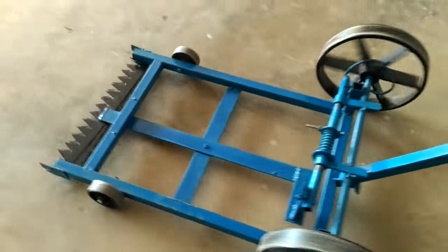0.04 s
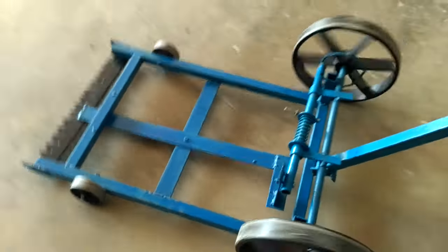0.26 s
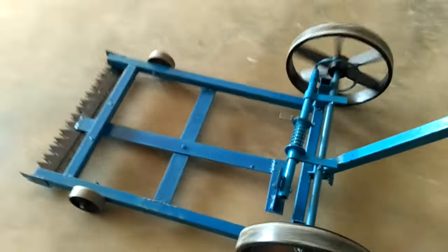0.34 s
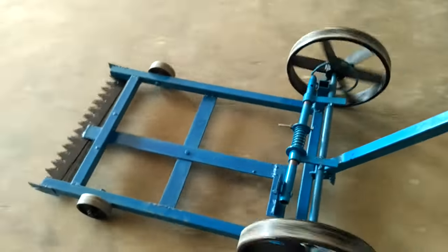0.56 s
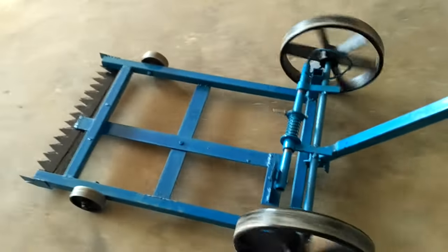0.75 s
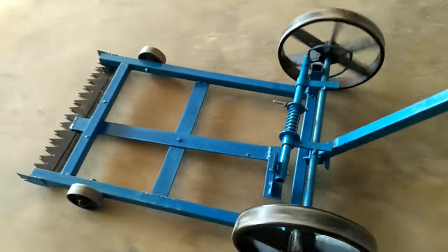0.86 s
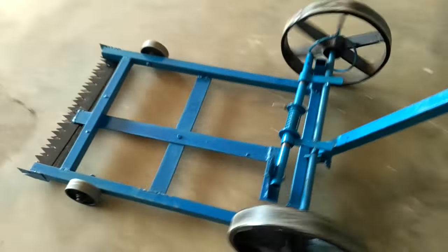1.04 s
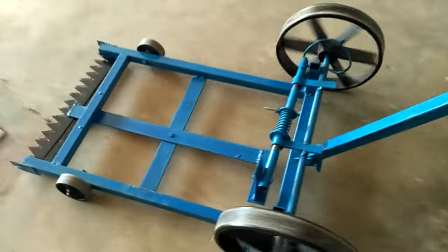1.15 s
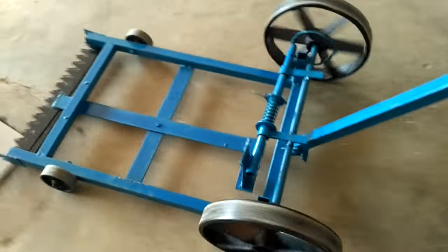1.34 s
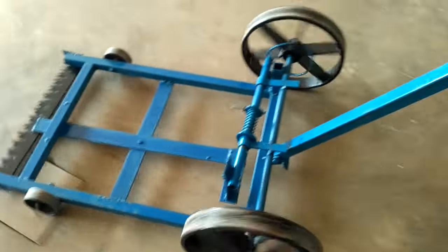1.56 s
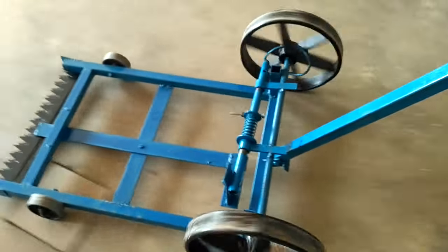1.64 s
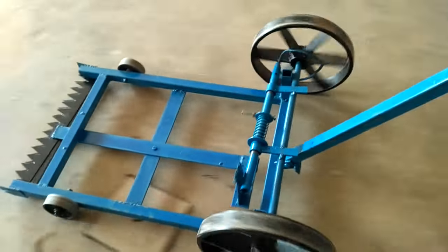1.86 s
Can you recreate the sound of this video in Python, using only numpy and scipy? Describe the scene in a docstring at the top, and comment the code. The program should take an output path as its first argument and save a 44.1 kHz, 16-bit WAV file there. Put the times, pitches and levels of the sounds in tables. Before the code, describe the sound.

Metal clanking and blade rasping from a grass cutter pushed across a concrete floor.

```python
"""A hand-pushed steel grass cutter rolls over a concrete floor in a bare room.
Its wheel-driven linkage throws the toothed blade from side to side: loose joints clank,
small parts ping, the blade rasps in its guides and the hardest stop jolts the frame.
The iron wheels hiss on grit, then thud and rumble over a flat scrap lying on the floor."""
import sys
import numpy as np
from scipy import signal
from scipy.io import wavfile

SR = 44100
rng = np.random.default_rng(int(sys.argv[2]) if len(sys.argv) > 2 else 0)


def unload_wav(signal):
    """Save mono or channel-first audio to the path in sys.argv[1] as 16-bit WAV at rate SR, clipped to [-1, 1]."""
    wavfile.write(
        sys.argv[1],
        SR,
        np.round(np.clip(np.atleast_2d(signal).T, -1, 1) * 32767).astype(np.int16),
    )


N = 83790

# linkage blows (time [s], frame knock [dB], bar clang [dB], blade sheen [dB], decay [s])
LINKAGE_BLOWS = [(0.026, -40.5, -56, -34, 0.0022), (.044, -60, -63, -28, 0.0017),
                 (0.109, -46, -40.5, -31, 0.012), (0.129, -42.5, -35.5, -38, 0.0051),
                 (.186, -45.5, -35, -32, 0.0096), (.198, -37, -33.5, -27.5, 0.0076),
                 (0.22, -46, -60, -36, 0.0049), (0.281, -41.5, -57, -37, .005),
                 (0.312, -45, -32.5, -29.5, 0.0078), (0.32, -42.5, -33.5, -24.5, 0.011),
                 (0.359, -55, -29.5, -29.5, 0.013), (.377, -43, -28.5, -40, 0.01),
                 (.388, -45, -22, -21.5, .012), (0.422, -64, -28, -28, 0.0098),
                 (0.436, -68, -31, -27, 0.024), (.453, -51, -27, -24, 0.018),
                 (0.4675, -42, -21.5, -18.5, 0.0028), (0.4774, -30.5, -16.5, -14.5, 0.0059),
                 (.492, -41, -27, -21.5, 0.019), (.515, -51, -38, -27, 0.037),
                 (0.593, -46, -47, -61, 0.0084), (.626, -46.5, -46, -57, 0.014),
                 (0.689, -65, -40, -30, 0.001), (.759, -46.5, -49, -63, .009),
                 (.802, -41, -44, -56, 0.0059), (0.814, -52, -60, -68, 0.057), (.920, -44, -48, -28, 0.004),
                 (0.942, -43, -31.5, -20, 0.0034), (.956, -43, -30.5, -27.5, 0.015),
                 (0.976, -67, -28.5, -28, 0.023), (.989, -54, -44, -25, 0.0065),
                 (1.038, -39.5, -38, -30, 0.0087), (1.066, -55, -34, -30, 0.01),
                 (1.084, -36, -25, -23.5, 0.013), (1.098, -67, -26.5, -23, .005),
                 (1.128, -41, -56, -28.5, 0.0082), (1.166, -41, -60, -29, 0.0045),
                 (1.3117, -46, -27.5, -30, 0.0077), (1.3176, -56, -26, -13.5, 0.0022),
                 (1.324, -42.5, -34, -22.5, 0.0082), (1.342, -71, -61, -27, 0.024),
                 (1.435, -66, -42, -51, 0.0036), (1.4933, -43.5, -37.5, -32, 0.0066),
                 (1.505, -49, -43, -30.5, 0.036), (1.5641, -53, -48, -30, 0.0047),
                 (1.572, -45, -38.5, -38, 0.055), (1.591, -31.5, -35, -43, 0.009),
                 (1.5976, -34.5, -19.5, -17, 0.0068), (1.614, -41.5, -34.5, -23.5, 0.011),
                 (1.630, -45.5, -42, -26.5, 0.016), (1.669, -43, -47, -42, 0.011),
                 (1.716, -44, -67, -70, 0.0023)]
# spectra of struck frame, bars and blade (frequency [Hz], gain [dB])
KNOCK_SPECTRUM = [(100, -29.5), (600, -16), (1000, -20), (1350, -3.5), (1650, -6.5), (2050, 1.5), (2600, 0),
                  (3100, -4.5), (4000, -26), (6000, -43)]
CLANG_SPECTRUM = [(1000, -35.5), (2500, -13.5), (3200, 0), (3700, 3), (4500, -0.5), (5100, -3.5),
                  (5700, -4), (6800, -9.5), (7900, -9), (11000, -8)]
SHEEN_SPECTRUM = [(3000, -60), (6800, -13), (8000, -13), (9000, -9), (9900, -5.5), (10800, -6),
                  (12000, -1.5), (13300, -1), (14500, -6), (16000, 0)]
# steelwork resonances (frequency [Hz], width [Hz], boost [dB])
STEEL_MODES = [(1980, 77, 6), (2440, 170, 1.5), (3330, 25, -1.5), (3557, 61, 5), (3730, 22, 4.5),
               (3850, 21, -1.5), (4460, 35, -2), (4940, 41, 2.5), (5636, 34, 6.5), (5850, 110, 4),
               (7010, 23, -7), (7510, 42, 6.5), (7780, 75, 4.5), (9800, 72, 7.5), (13060, 160, 6.5),
               (13950, 170, 6), (13900, 300, 3.5)]
# blows on small parts, plus the wheel's long low ring (time [s], pitch [Hz], level [dB], t60 [s])
PING_BLOWS = [(.005, 4550, -42, 0.1), (.028, 10000, -36, 0.054), (0.198, 2550, -37.5, 0.083),
              (.2, 563.4, -54.5, 0.79), (.31, 601, -49.5, 0.37), (.318, 2643, -36.5, 0.057),
              (.388, 7080, -30, .07), (.391, 7520, -24.5, 0.093), (.452, 3676, -27.5, 0.15),
              (.4785, 13780, -16, 0.055), (0.48, 3785, -20, 0.065), (0.478, 2652, -29, 0.075),
              (0.491, 9700, -33, 0.11), (0.6883, 8830, -30, 0.0087), (0.942, 9840, -22, 0.026),
              (0.986, 9870, -31, 0.26), (1.316, 3706, -28.5, .045), (1.316, 4010, -21, 0.013),
              (1.318, 4650, -24.5, 0.017), (1.3193, 13600, -12, 0.019), (1.495, 1420, -37.5, 0.013),
              (1.505, 2950, -43, 0.091), (1.506, 3294, -39.5, 0.14), (1.512, 7500, -47, 0.11),
              (1.5645, 9830, -23.5, 0.079)]
# low frame modes (frequency [Hz], level [dB], t60 [s])
JOLT_MODES = [(233, -39.5, .06), (307, -51, 0.11), (493, -35, 0.042), (666, -39, 0.036)]
# blade sliding, teeth sizzling (time [s], level [dB])
RASP_ENVELOPE = [(0, -37.5), (.09, -44.5), (.17, -43), (.25, -37), (.3, -44.5), (.42, -37.5), (.53, -42),
                 (.6, -43), (.67, -65), (.885, -76), (.915, -33.5), (1.0, -40), (1.12, -35.5), (1.2, -42.5),
                 (1.29, -59), (1.485, -59), (1.51, -65), (1.65, -63), (1.73, -61.5), (1.9, -67)]
SIZZLE_ENVELOPE = [(.68, -78), (.692, -42), (.722, -39.5), (.755, -55), (.785, -80)]
# their spectra (frequency [Hz], gain [dB])
RASP_SPECTRUM = [(500, -35), (1500, -11), (2100, 0.5), (3000, -2), (3600, -3), (4900, -2.5), (5600, 4.5),
                 (7000, -1), (8000, 8.5), (9900, 4), (11000, 4), (13200, 4), (16000, -9.5)]
SIZZLE_SPECTRUM = [(8000, -47), (11500, -40), (12200, 1), (13300, -3), (15500, -4)]
# wheel bumps (time [s], level [dB], pitch [Hz], decay [s])
WHEEL_BUMPS = [(.03, -62, 74, 0.045), (.17, -58, 66.3, 0.014), (.198, -49, 657, 0.0055),
               (.30, -58, 94, 0.079), (0.383, -57, 91, 0.0081), (.390, -42, 483, 0.0044),
               (.472, -42.5, 595, 0.0085), (0.483, -46.5, 430, 0.0059), (0.48, -54, 195, 0.01),
               (1.079, -59, 92, 0.0038), (1.251, -52.5, 355, 0.01), (1.374, -53, 224, 0.013),
               (1.531, -44, 268, 0.024), (1.57, -47, 277, 0.012), (1.591, -35, 580, 0.0026),
               (1.611, -39, 199, 0.0045), (1.633, -39, 290, 0.014), (1.692, -44, 338, 0.0059),
               (1.712, -49.5, 70, 0.015), (1.786, -49.5, 248, 0.019), (1.80, -53, 53.7, 0.022),
               (1.83, -50.5, 199, 0.0064)]
# crushed grit, rim hiss, frame rumble (time [s], level [dB])
GRIT_ENVELOPE = [(0, -43.5), (.2, -47), (.45, -43), (.62, -55), (.72, -48.5), (.83, -52.5), (.92, -46),
                 (1.15, -49.5), (1.27, -49.5), (1.45, -52.5), (1.65, -47), (1.76, -55), (1.9, -57)]
RIM_ENVELOPE = [(0, -50), (.3, -54), (.62, -47.5), (.72, -48.5), (.82, -62), (.9, -43.5), (1.2, -51),
                (1.3, -52.5), (1.45, -63), (1.67, -45.5), (1.75, -77), (1.9, -84)]
RUMBLE_ENVELOPE = [(0, -67.5), (.18, -67), (.38, -83), (.6, -69), (.92, -74), (1.2, -68.5), (1.37, -68),
                   (1.47, -74), (1.56, -51), (1.67, -55), (1.75, -57), (1.82, -56), (1.88, -57)]
# their spectra (frequency [Hz], gain [dB])
GRIT_SPECTRUM = [(90, -13.5), (150, -9.5), (300, -5), (560, 2.5), (700, -1), (830, 3.5), (1050, -4.5),
                 (1600, 0.5), (2050, 1.5), (2600, 5), (2900, 0.5), (3300, 6), (4700, -3.5), (7000, -11),
                 (10000, -24.5), (16000, 3)]
RIM_SPECTRUM = [(2000, -25.5), (4800, -6), (5300, 7.5), (5700, 2.5), (6300, 0.5), (6900, -5), (7800, -2.5),
                (8700, -4), (10000, -12.5), (16000, -21)]
RUMBLE_SPECTRUM = [(25, -24), (42, -21), (54, -2), (75, -3), (98, 8.5), (130, -4), (170, 6.5), (300, 10.5),
                   (450, -3), (700, -7), (1200, -8.5), (4000, -42)]
# room decay (frequency [Hz], t60 [s])
ROOM_DECAY = [(150, 0.35), (1000, 0.34), (3500, 0.21), (5700, 0.29), (9000, 0.14), (13000, 0.23),
              (16000, 0.19)]

CLANK_RISE_S, PING_RISE_S, THUD_RISE_S = 0.00047, 0.0018, 0.0011
ROOM_DB = -12.5


def clanks(glance_share=0.077):
    """Each linkage blow is a short chatter of contacts exciting frame, bars and blade."""
    drives = np.zeros((3, N))
    for time_s, *levels_db, decay_s in LINKAGE_BLOWS:
        # longer, glancing blows swell more slowly
        shape = strike(CLANK_RISE_S + glance_share * decay_s, decay_s)
        for drive, db in zip(drives, levels_db):
            burst = rng.standard_normal(len(shape)) * shape
            add(drive, time_s, amp(db) * burst * np.linalg.norm(shape) / np.linalg.norm(burst))
    spectra = (KNOCK_SPECTRUM, CLANG_SPECTRUM, SHEEN_SPECTRUM)
    return sum(colour(drive, spectrum, STEEL_MODES) for drive, spectrum in zip(drives, spectra))


def pings(roughness=0.44, flutter_s=0.0023):
    """Small steel parts ring, fluttering as they chatter against their neighbours; the wheel adds a long low
    ring."""
    out = np.zeros(N)
    window = np.hanning(int(flutter_s * SR))
    for time_s, hz, db, t60_s in PING_BLOWS:
        shape = strike(PING_RISE_S, t60_s / np.log(1000))
        phase = 2 * np.pi * hz * np.arange(len(shape)) / SR
        noises = rng.standard_normal((2, len(shape)))
        flutter, jitter = (unit_rms(signal.fftconvolve(noise, window, "same")) for noise in noises)
        ring = (1 + roughness * flutter) * np.sin(phase) + roughness * jitter * np.cos(phase)
        add(out, time_s, amp(db) * shape * ring / np.sqrt(1 + 2 * roughness ** 2))
    return out


def jolt(time_s=1.3105):
    """The blade's hardest stop rings the frame's low modes."""
    out = np.zeros(N)
    for hz, db, t60_s in JOLT_MODES:
        shape = strike(THUD_RISE_S, t60_s / np.log(1000))
        phase = 2 * np.pi * hz * np.arange(len(shape)) / SR
        add(out, time_s, amp(db) * shape * np.sin(phase))
    return out


def blade(grains_per_s=4300, spread_db=1):
    """The blade rasps through its guides; once, the tip catches and the thin teeth sizzle."""
    sliding = grains(grains_per_s, spread_db) * level(RASP_ENVELOPE)
    catching = grains(grains_per_s, spread_db) * level(SIZZLE_ENVELOPE)
    return colour(sliding, RASP_SPECTRUM, STEEL_MODES) + colour(catching, SIZZLE_SPECTRUM)


def wheels():
    """Grit crackles under the wheels, the rims hiss on concrete, the frame rumbles."""
    crushing = grains(per_s=5000, spread_db=2.5) * level(GRIT_ENVELOPE)
    grit = colour(crushing, GRIT_SPECTRUM, STEEL_MODES)
    hiss = colour(rng.standard_normal(N) * level(RIM_ENVELOPE), RIM_SPECTRUM, STEEL_MODES)
    rumble = colour(rng.standard_normal(N), RUMBLE_SPECTRUM) * level(RUMBLE_ENVELOPE)
    return grit + hiss + rumble


def thuds(cutoff_hz=773):
    """Wheel bumps: noise bursts through a heavily damped resonance."""
    out = np.zeros(N)
    lowpass = signal.butter(6, cutoff_hz, fs=SR, output="sos")
    for time_s, db, hz, decay_s in WHEEL_BUMPS:
        shape = strike(THUD_RISE_S, decay_s)
        burst = shape * rng.standard_normal(len(shape))
        b, a = signal.iirpeak(hz, Q=1.58, fs=SR)
        ring = signal.lfilter(b, a, signal.lfilter(b, a, burst))
        bump = signal.sosfilt(lowpass, ring)
        add(out, time_s, amp(db) * bump * np.linalg.norm(shape) / np.linalg.norm(bump))
    return out


def room(x, build_s=0.005):
    """Hard-wall reflections build up, then die band by band."""
    reflections = rng.standard_normal(SR) * (rng.random(SR) < .15)
    hz, time_s, bands = signal.stft(reflections, SR, nperseg=256)
    decay = np.exp(-np.log(1000) * time_s / interp_log_hz(ROOM_DECAY, hz)[:, None])
    tail = signal.istft(bands * decay, SR, nperseg=256)[1][:SR]
    tail *= 1 - np.exp(-(np.arange(SR) / SR / build_s) ** 2)
    return signal.fftconvolve(x, tail / np.linalg.norm(tail))[:N]


def amp(db):
    """Decibels to gain."""
    return 10 ** (np.asarray(db) / 20)


def unit_rms(x):
    """Scales to rms 1."""
    return x / np.sqrt(np.mean(x ** 2) + 1e-20)


def interp_log_hz(points, hz):
    """Table value on a log-frequency axis."""
    points_hz, values = np.transpose(points)
    return np.interp(np.log(hz + 1), np.log(points_hz), values)


def level(envelope):
    """Gain per sample from (time [s], level [dB])."""
    return amp(np.interp(np.arange(N) / SR, *np.transpose(envelope)))


def add(mix, time_s, sound):
    """Mixes a sound in at time_s."""
    part = mix[round(time_s * SR):][:len(sound)]
    part += sound[:len(part)]


def colour(x, spectrum, modes=(), size=8192):
    """Minimum-phase, unit-energy filter: broad spectrum times resonances."""
    hz = abs(np.fft.fftfreq(size, 1 / SR))
    gain = amp(interp_log_hz(spectrum, hz))
    for mode_hz, width_hz, boost_db in modes:
        gain *= np.sqrt(1 + (amp(boost_db) ** 2 - 1) / (1 + (2 * (hz - mode_hz) / width_hz) ** 2))
    response = np.exp(np.conj(signal.hilbert(np.log(gain))))
    taps = np.fft.ifft(response).real[:size // 2]
    return signal.fftconvolve(x, taps / np.linalg.norm(taps))[:N]


def strike(rise_s, decay_s):
    """Envelope: quick rise, exponential fall, peak 1."""
    time_s = np.arange(SR // 4) / SR
    shape = (1 - np.exp(-(time_s / rise_s) ** 2)) * np.exp(-time_s / decay_s)
    return shape / shape.max()


def grains(per_s, spread_db):
    """Tiny random impacts, a few stronger; rms 1."""
    strength = amp(spread_db * np.minimum(rng.exponential(1, N), 4))
    sign = rng.choice([-1., 1.], N)
    hits = rng.random(N) < per_s / SR
    return unit_rms(strength * sign * hits)


def scene():
    """Cutter plus room, mono; pings stay dry."""
    cutter = clanks() + blade() + wheels() + thuds() + jolt()
    return (cutter + pings() + amp(ROOM_DB) * room(cutter))[None]


def record(dry, cutoff_hz=15780):
    """Steep linear-phase low-pass."""
    taps = signal.firwin(511, cutoff_hz, window=("kaiser", 9), fs=SR)
    return signal.oaconvolve(dry, taps[None], "same")


dry = scene()
out = record(dry)
unload_wav(out)
```